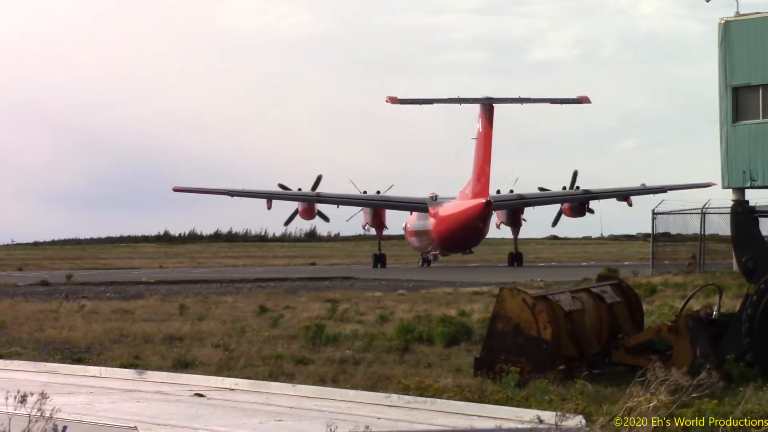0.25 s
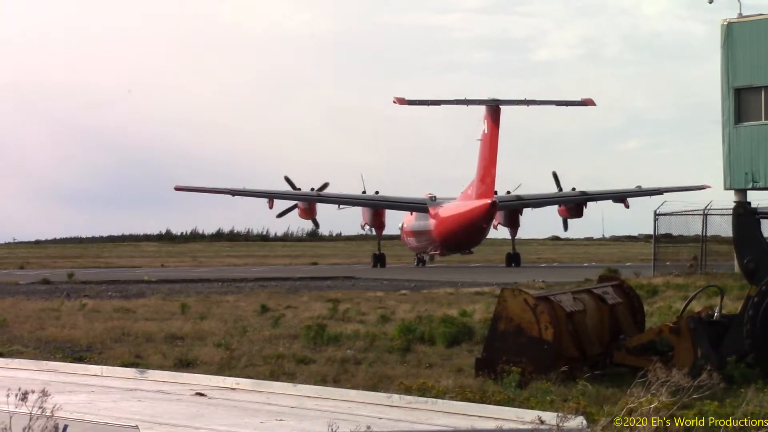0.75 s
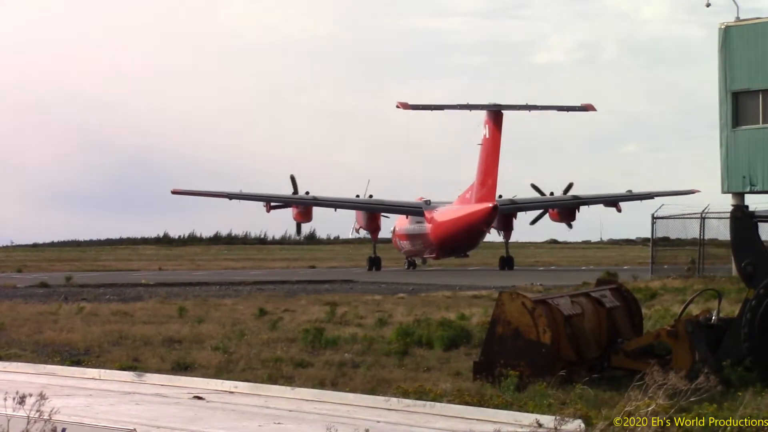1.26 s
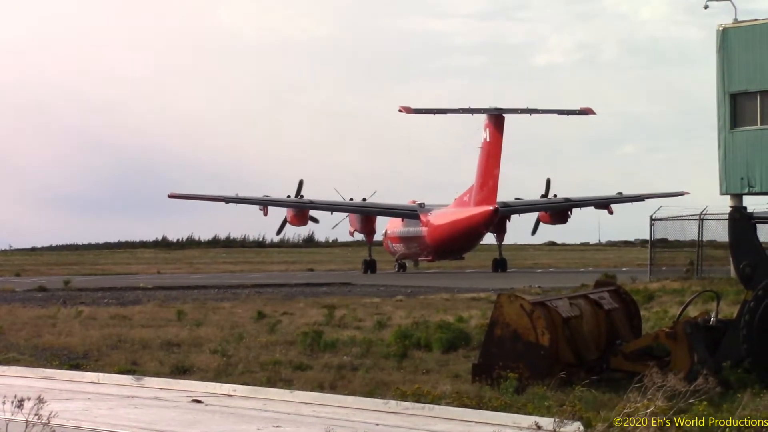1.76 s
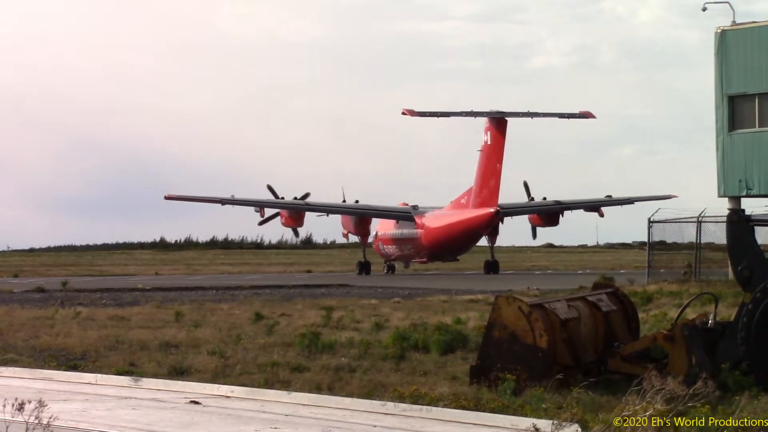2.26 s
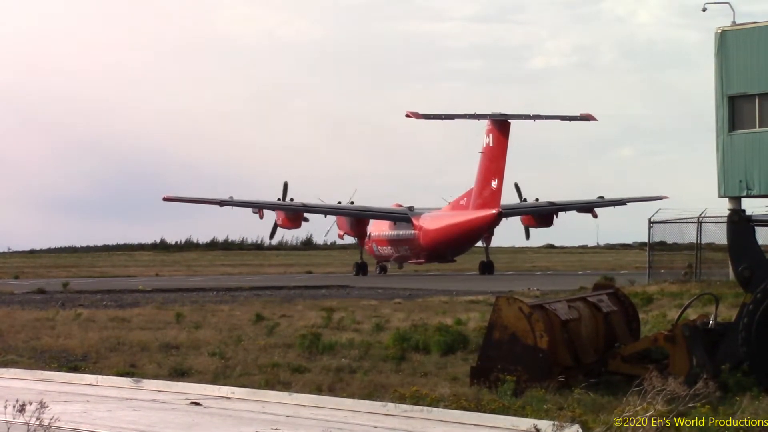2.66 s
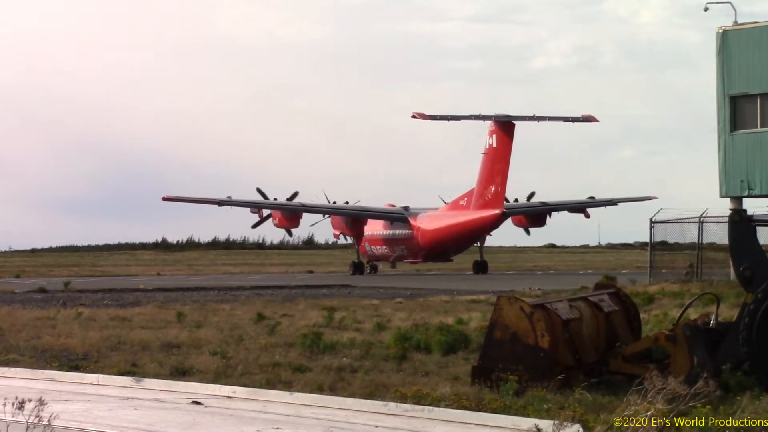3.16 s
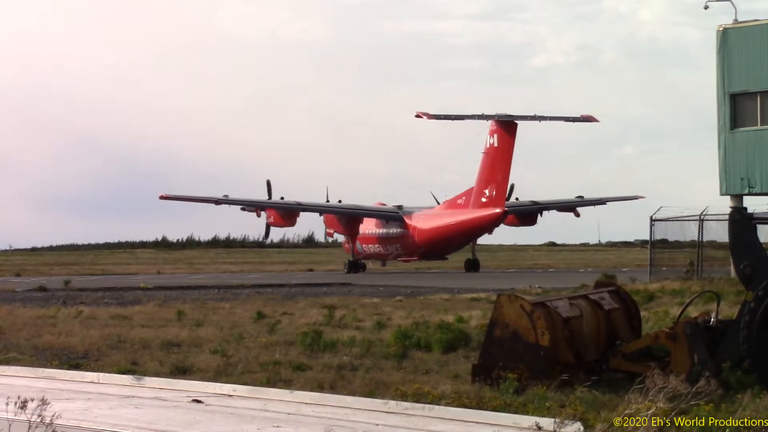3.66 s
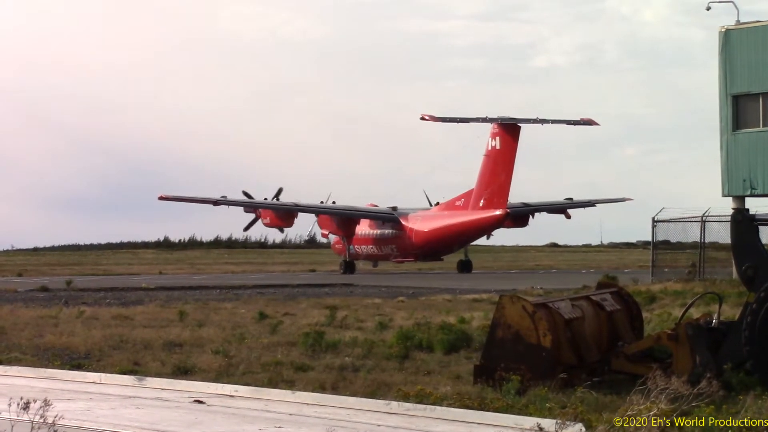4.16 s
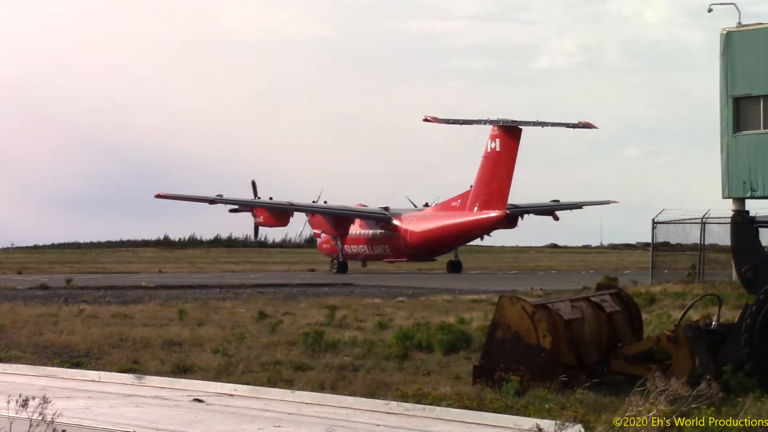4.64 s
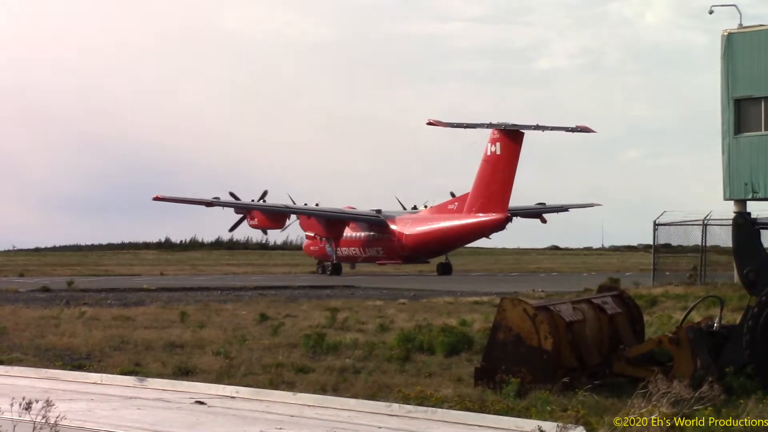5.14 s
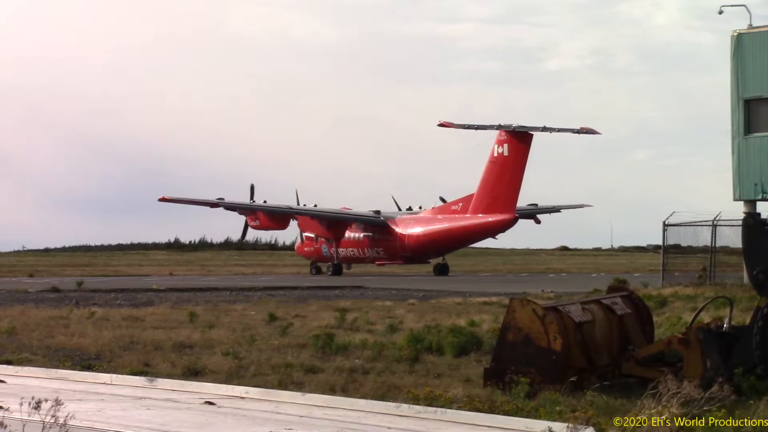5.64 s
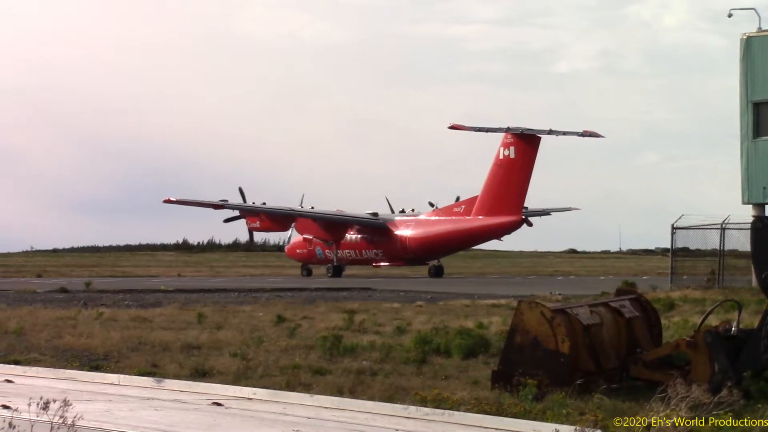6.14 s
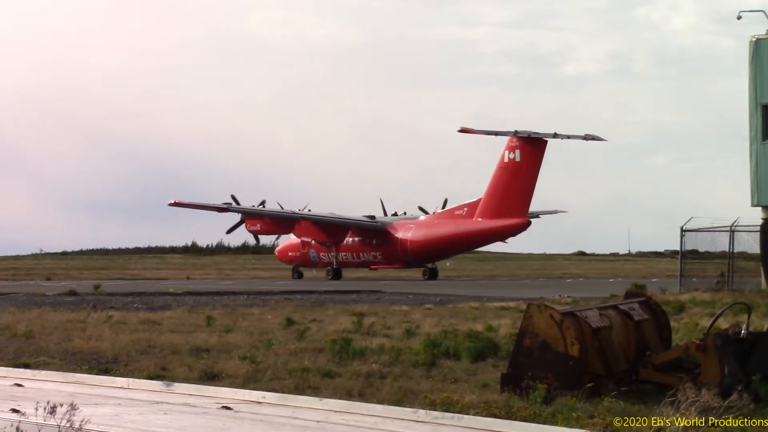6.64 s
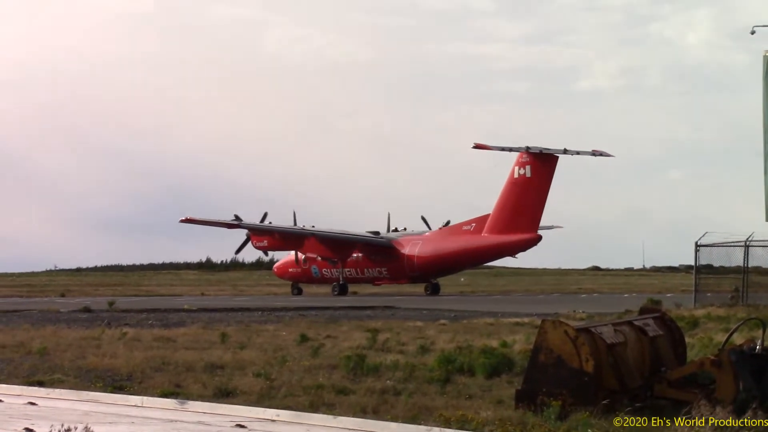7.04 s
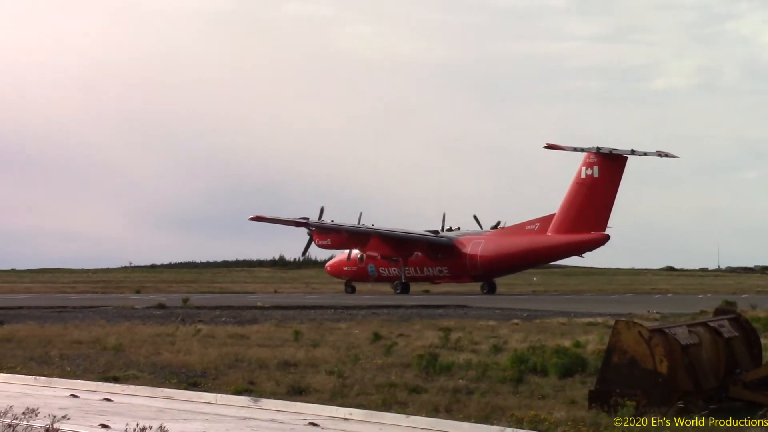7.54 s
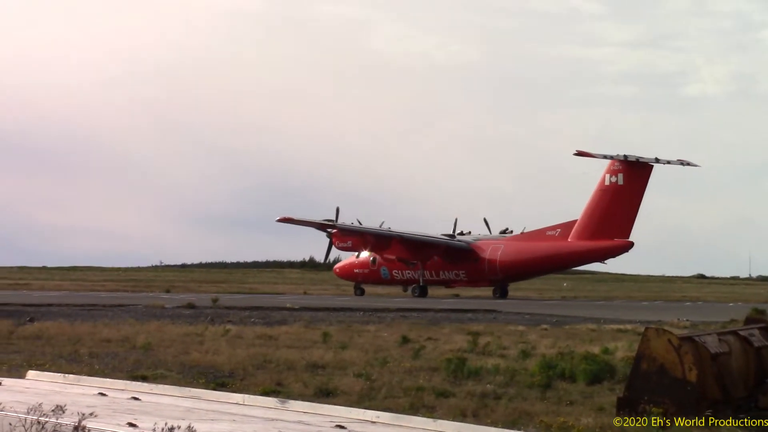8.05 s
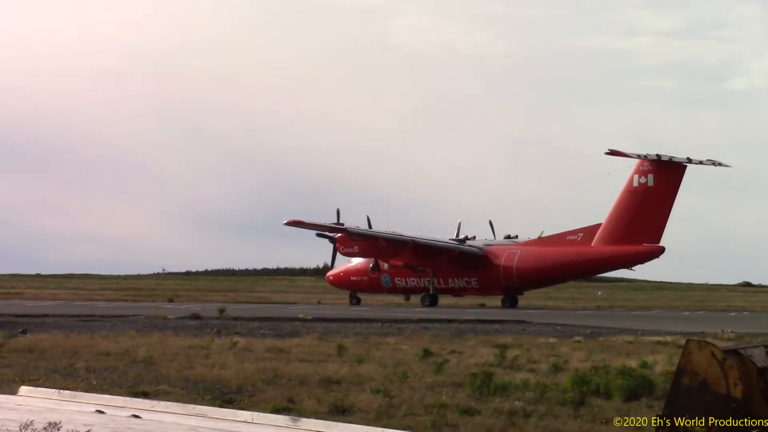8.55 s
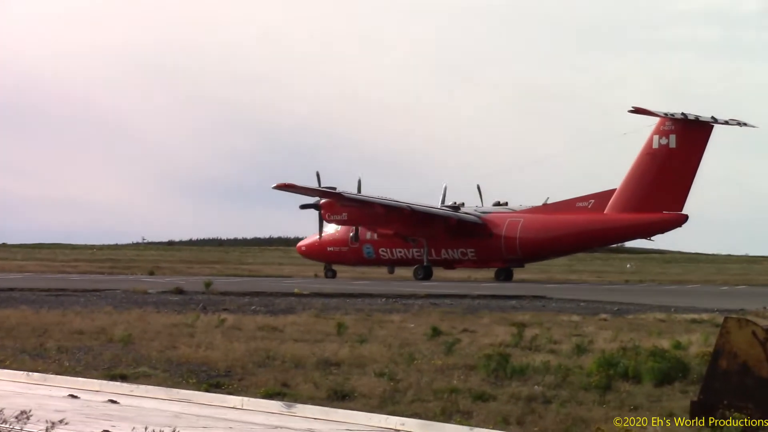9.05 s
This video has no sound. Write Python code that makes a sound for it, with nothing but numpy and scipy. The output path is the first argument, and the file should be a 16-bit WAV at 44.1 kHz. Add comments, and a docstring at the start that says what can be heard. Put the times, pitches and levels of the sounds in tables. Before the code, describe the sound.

A turboprop plane taxis past with a throbbing low drone, roaring propeller wash and a hissing high turbine whine.

```python
"""Turboprop taxiing past

A four-engined turboprop idles across an airfield, turning from tail-on to side-on. Its exhausts
rumble and drone, the propeller wash roars, and the turbines hiss with a fuzzy compressor whine.
As the engines' sides come into view, ducts ring and blades chop the hiss. A breeze nudges the mics."""
import sys
import numpy as np
from scipy.fft import rfft, irfft, next_fast_len
from scipy.io import wavfile
from scipy.ndimage import uniform_filter1d, map_coordinates

SR = 44100
rng = np.random.default_rng(int(sys.argv[2]) if len(sys.argv) > 2 else 0)


def wav_record(signal):
    """Record a signal, one row per channel, as 16-bit PCM in the file named by sys.argv[1]."""
    frames = np.transpose(np.atleast_2d(signal))
    bounded = np.clip(frames, -1, 1)
    # unit amplitude maps onto the largest positive 16-bit level
    quanta = np.round(bounded * 32767).astype(np.int16)
    wavfile.write(sys.argv[1], SR, quanta)


N = 410130

# mic pair: freq_hz, coherence, left_lag_rad, left_minus_right_db
MIC_PAIR = [(60, 0.9, 0, 0.7), (300, 0.89, 0, 0.3), (500, 0.64, 0, 0.5), (810, 0.91, 0, -1),
            (1090, 0.8, 1.03, -2), (1410, 1, 0.34, 0), (1940, 0.4, 0.33, -0.1), (2280, .4, 3, 8),
            (2550, .45, 0.5, 0), (2700, 0.7, 1.5, -4), (3060, 0.4, 1, 0), (4600, .8, 0.8, -3),
            (5700, .6, 0.94, 2.5), (7300, 0.4, 2.5, -1), (8750, 0.2, 0.5, 1), (10500, 0.1, -8.5, 0)]
# time_s, roar_left_minus_right_db, turbine_left_minus_right_db
BALANCE = [(0, -0.5, -0.44), (2.2, -0.9, -0.78), (3.7, 0.4, 0.67), (5.1, 0, 0.64), (6.2, -1.5, -0.0048),
           (9.3, -1.3, 0.065)]
# the turn: time_s, side_share
SIDE_VIEW = [(0, 0.13), (2.2, 0), (4.25, 0.15), (4.65, 0.63), (5.3, 0.92), (6.4, 0.81), (7.8, 1),
             (9.3, 0.81)]
# propeller speed: time_s, turns_per_s
SHAFT_SPEED = [(0, 14.3), (4.9, 14.43), (5.4, 14.79), (7, 14.8), (9.3, 14.85)]
# compressors: time_s, pitch_hz
WHINE_PITCH = [(0, 5006), (.7, 5010), (1.27, 4960), (2.6, 4986), (5.4, 5056), (6.4, 5074), (7.5, 4990),
               (8.15, 4910), (8.6, 4970), (9.3, 4950)]
# level curves: time_s, level_db
DEEP_WASH_LEVEL = [(0.05, -28), (0.1, -26.5), (1.23, -25), (4.25, -29.5), (4.56, -26), (4.74, -28.5),
                   (6.23, -24.5), (6.41, -27), (6.97, -27), (7.76, -29), (9.12, -27), (9.25, -25.5)]
DRONE_LEVEL = [(0.05, -24), (0.5, -23.5), (0.89, -21.5), (1.1, -25.5), (1.45, -22.5), (2.1, -24),
               (2.41, -25.5), (4.23, -25.5), (5.3, -21.5), (5.97, -18), (6.48, -21), (6.65, -21),
               (7.6, -19.5), (8.2, -19.5), (8.65, -21), (8.9, -19), (9.25, -19)]

# noise spectra: freq_hz, relative_density_db
AIR_SPECTRUM = [(100, 14), (3000, 8.5), (9000, 7.5), (12500, 2), (13300, -1), (15700, -4.5)]
INTAKE_SPECTRUM = [(3000, -42.5), (4150, -6), (4500, 1.5), (4750, -2.5), (5100, -3), (5400, -7.5),
                   (5900, -10), (6600, -18.5), (7400, -21), (8400, -21.5), (9300, -28.5), (11000, -35.5),
                   (12500, -43), (13200, -70)]
PIPE_REAR_SPECTRUM = [(500, -52), (1050, 1), (1220, -1), (1500, -2), (1700, -6), (1900, -8), (2150, -16),
                      (2600, -30.5), (8000, -120)]
PIPE_SIDE_SPECTRUM = [(500, -53.5), (1100, -4.5), (1360, 0.5), (1510, -2), (1670, -12), (1870, -6),
                      (2000, -13.5), (2130, -24.5), (7000, -120)]
HISS_REAR_SPECTRUM = [(1200, -21.5), (2100, -1), (2950, 0), (3300, -3), (3950, -3), (4400, -10),
                      (5400, -15.5), (6700, -19.5), (10000, -31), (12500, -36), (16000, -57.5)]
HISS_SIDE_SPECTRUM = [(1200, -26.5), (2200, 3.5), (3300, -1.5), (4000, -3.5), (4400, -8.5), (5400, -19.5),
                      (6700, -28), (12500, -42), (16000, -63.5)]
FLUTTER_SPECTRUM = [(200, -29.5), (400, -1.5), (650, 0), (820, -4), (1050, -19), (2000, -49.5),
                    (4000, -120)]
DEEP_WASH_SPECTRUM = [(100, -61), (350, -0.5), (440, 3), (530, 1), (670, -1.5), (790, -13), (1300, -59),
                      (3000, -120)]
BRIGHT_WASH_SPECTRUM = [(300, -53.5), (620, -7), (750, 1.5), (840, 0.5), (980, -5.5), (1150, -10.5),
                        (1400, -22), (2500, -75.5), (5000, -120)]
RUMBLE_SPECTRUM = [(35, -40.5), (49, -15), (58, 1), (70, 1.5), (86, -2), (104, 1), (128, 4.5), (150, -2),
                   (175, -3), (240, -13.5), (700, -120)]
DRONE_REAR_SPECTRUM = [(100, -39), (160, -7), (190, -5), (290, -1.5), (360, -2), (430, -4.5), (520, -19),
                       (900, -48), (2000, -120)]
DRONE_SIDE_SPECTRUM = [(100, -34.5), (160, -8), (200, -0.5), (280, 1), (360, -1.5), (425, -10),
                       (520, -25.5), (900, -52), (2000, -120)]

# resonances: centre_hz, width_hz, lift_db
DUCT_MODES = [(2470, 290, 7.2), (2954, 230, 6.3), (3670, 520, 5.3)]
EXHAUST_MODES = [(187, 24.5, 8.5), (238.2, 16, 5.5), (259.3, 20.2, 6.5), (303, 33.7, 5.5), (387, 130, 1)]

# wind on the mics: centre_s, half_length_s, level_db
GUSTS = [(1.6, .06, -42), (2.17, .15, -46), (5.28, 0.071, -42), (5.942, 0.12, -36), (6.218, .07, -40),
         (7.5, .12, -50), (8.65, .06, -48)]
# swells and sags: centre_s, half_length_s, lift_db
WHINE_FLARES = [(.25, .3, 4), (1.58, .08, 4), (6.2, .35, 2), (7.8, .35, -0.5)]
INTAKE_SURGES = [(5.22, 0.22, 2.5), (6.0, 0.31, 2), (7.05, 0.21, 2.5), (9.1, 0.6, 5)]
DRONE_THROBS = [(.92, 0.027, 3), (1.77, 0.027, -9), (1.87, 0.041, 0.5), (3.92, .04, -2),
                (5.35, 0.015, -4.5), (5.5, 0.023, 5), (5.57, 0.02, -5), (5.93, 0.024, 3),
                (6.07, 0.044, -6.5), (6.125, 0.014, 6), (6.26, 0.02, 5), (6.44, 0.036, 4),
                (6.53, 0.033, -6), (6.76, 0.034, 2.5), (6.92, 0.046, 3), (7.02, 0.026, -4.5),
                (7.14, 0.051, 1), (7.5, 0.027, 3), (7.62, 0.029, 3), (7.89, 0.057, -4.5),
                (8.06, 0.042, -6.5), (8.14, .03, 2), (8.335, 0.021, 2.5), (8.81, 0.019, 6),
                (9.14, 0.019, 5)]

# noise bursts: centre_s, centre_hz, width_hz, half_length_s, level_db
COMPRESSOR_SQUEALS = [(.3, 4000, 180, .35, -61.5), (1.27, 4850, 60, .06, -57),
                      (4.72, 5630, 800, 0.15, -60.5), (5.0, 4580, 300, .28, -57),
                      (5.08, 5750, 450, .13, -60), (5.13, 7800, 800, .16, -72), (6.05, 5100, 220, .15, -58),
                      (6.38, 5080, 240, .19, -57), (6.95, 8400, 700, .2, -78), (7.05, 4450, 600, 0.19, -54),
                      (7.08, 5000, 220, .13, -55.3), (7.72, 4900, 160, .1, -56), (8.13, 4900, 80, .13, -54),
                      (8.88, 8400, 600, .14, -72), (9.05, 4970, 200, 0.3, -52), (9.13, 4540, 250, .17, -54),
                      (9.22, 8300, 800, .12, -73)]  # tones beamed at the mics
BLADE_SLAPS = [(2.75, 680, 600, .0016, -19.5), (2.872, 700, 600, .0016, -21.5),
               (4.622, 3600, 3200, .004, -46), (4.691, 3600, 3200, .004, -47),
               (4.76, 3600, 3200, .004, -48), (4.829, 3600, 3200, 0.003, -39.5),
               (5.039, 3600, 3200, .005, -45), (5.181, 3600, 3200, .007, -45),
               (5.21, 3600, 3200, .004, -44), (5.548, 1400, 450, .002, -29),
               (5.565, 1400, 450, 0.0023, -35), (5.581, 1310, 500, 0.0022, -24.5),
               (5.734, 1400, 600, .0025, -29), (5.751, 1340, 600, 0.0018, -32),
               (5.917, 700, 600, .0014, -22), (5.985, 680, 500, 0.0014, -24),
               (6.053, 610, 500, 0.0023, -16.5), (6.106, 700, 500, 0.0013, -18),
               (6.19, 640, 500, 0.0018, -16), (6.207, 580, 500, .002, -14.5), (6.257, 1350, 600, .002, -31),
               (6.395, 1400, 600, 0.0024, -30), (6.528, 1400, 600, 0.0027, -34),
               (6.653, 950, 900, .0016, -27), (7.02, 1400, 600, 0.0022, -27)]  # blades hit rough air
WASH_WHOOSHES = [(.82, 990, 110, 0.074, -33), (.92, 1140, 260, 0.22, -39.5), (0.93, 842, 16, 0.079, -27.5),
                 (.95, 660, 300, 0.17, -34), (1.27, 760, 400, .035, -30.5), (.97, 1820, 500, .12, -48.5),
                 (1.48, 300, 46, .045, -25), (1.55, 355, 60, 0.036, -21), (1.972, 398, 110, 0.049, -22.5),
                 (2.21, 298, 81, 0.05, -18), (2.2, 418, 110, 0.12, -26.5), (3.142, 182, 77, 0.022, -19.5),
                 (5.482, 135, 85, 0.02, -17.5), (5.45, 594, 300, 0.025, -26), (6.177, 704, 260, 0.006, -25),
                 (6.24, 420, 140, .07, -33), (7.0, 399, 110, 0.35, -29.5), (7.16, 367, 50, .05, -23),
                 (7.12, 108, 45, 0.1, -25)]

# phases of the turn: centre_s, half_length_s
TAIL_ON_S = (1.0, 0.7)  # slipstream sweeps the mics
HISS_LULL_S = (2.55, 1)
FAST_SWING_S = (4.8, 1)
EDGE_ON_S = (6.07, 0.2)
REAR_QUARTER_S = (6.26, 1.6)
DEEP_CHOP_S = (6.8, 1.1)


def amp(db):
    """Decibels to gain."""
    return 10 ** (np.asarray(db) / 20)


def unit(x):
    """x at rms 1."""
    return x / np.sqrt(np.mean(x ** 2) + 1e-20)


def over_frequency(rows, hz):
    """Table columns interpolated on a log frequency axis."""
    freq_hz, *columns = np.transpose(rows)
    return [np.interp(np.log(hz + 1), np.log(freq_hz + 1), c) for c in columns]


def over_time(rows):
    """Table columns interpolated per sample."""
    time_s, *columns = np.transpose(rows)
    return [np.interp(np.arange(N) / SR, time_s, c) for c in columns]


def wobble(rate_hz):
    """Smooth random curve."""
    knots = rng.standard_normal(int(N * rate_hz / SR) + 4)
    return map_coordinates(knots, [np.arange(N) * rate_hz / SR])


def phase_rad(hz):
    """Running angle of a changing rate."""
    return 2 * np.pi * np.cumsum(hz) / SR


def swell(centre_s, half_length_s):
    """Bell curve, peak 1."""
    return np.exp(-((np.arange(N) / SR - centre_s) / half_length_s) ** 2)


def surges_db(rows):
    """Sum of one swell per row."""
    return sum(lift_db * swell(centre_s, half_s) for centre_s, half_s, lift_db in rows)


def side_share():
    """Share of the engines' sides in view, 0-1."""
    return np.clip(over_time(SIDE_VIEW)[0], 0, 1)


def by_aspect(rear, side):
    """Equal-power fade from rear to side sound as the aircraft turns."""
    share = side_share()
    return np.sqrt(1 - share) * rear + np.sqrt(share) * side


def directivity_db(side_db, tail_db, quarter_db):
    """Lift when heard side-on, tail-on and from the rear quarter."""
    return side_db * side_share() + tail_db * swell(*TAIL_ON_S) + quarter_db * swell(*REAR_QUARTER_S)


def rush(spectrum, modes=()):
    """Turbulent noise with resonances at the two mics; their mean has rms 1."""
    size = next_fast_len(N + 8192)
    hz = np.fft.rfftfreq(size, 1 / SR)
    modes_db = sum(db / (1 + (2 * (hz - centre_hz) / width_hz) ** 4) for centre_hz, width_hz, db in modes)
    level_db = over_frequency(spectrum, hz)[0] + modes_db
    coherence, lag_rad, balance_db = over_frequency(MIC_PAIR, hz)
    mix_rad = np.arccos(np.clip(coherence, 0, 1)) / 2
    common, apart = rfft(rng.standard_normal((2, size))) * amp(level_db)
    sign = np.array([[1], [-1]])
    pair = np.cos(mix_rad) * common + sign * np.sin(mix_rad) * apart
    pair = pair * amp(sign * balance_db / 2) * np.exp(-sign * 0.5j * lag_rad)
    pair = irfft(pair, size)[:, :N]
    return pair / np.std(pair.mean(axis=0))


def steadied(x, share):
    """Noise with a share of its slow swells evened out."""
    power = np.abs(uniform_filter1d(np.mean(x ** 2, axis=0), size=SR // 8))
    return x * (power / power.mean()) ** (-share / 2)


def bursts(rows, coherence):
    """One swelling and fading stereo noise band per row."""
    size = 65536
    time_s = (np.arange(size) - size // 2) / SR
    hz = np.fft.rfftfreq(size, 1 / SR)
    out = np.zeros((2, N + 2 * size))
    for centre_s, centre_hz, width_hz, half_s, level_db in rows:
        band = np.exp(-(2 * (hz - centre_hz) / width_hz) ** 4 / 2)
        noise = irfft(rfft(rng.standard_normal((3, size))) * band)
        bell = np.exp(-(time_s / half_s) ** 2)
        pair = (np.sqrt(coherence) * noise[0] + np.sqrt(1 - coherence) * noise[1:]) * bell
        start = round(centre_s * SR)
        out[:, start:start + size] += amp(level_db) * np.sqrt(np.mean(bell ** 2)) * unit(pair)
    return out[:, size // 2:][:, :N]


def open_air():
    """Soft wind buffets on the mics over a faint steady hiss."""
    breeze = amp(-53 + 3 * wobble(8.5))
    gusts = sum(amp(level_db) * swell(centre_s, half_s) for centre_s, half_s, level_db in GUSTS)
    buffets = rush([(10, -15), (22, -4), (40, -1.5), (52, -2), (90, -25), (600, -120)])
    return (breeze + gusts) * steadied(buffets, share=0.7) + amp(-72.5) * rush(AIR_SPECTRUM)


def shaft_angle_rad(blade_pass_s=6.053):
    """Slightly unsteady propeller angle, zero at one blade pass."""
    angle_rad = phase_rad(over_time(SHAFT_SPEED)[0] + 0.04 * wobble(3))
    return angle_rad - angle_rad[round(blade_pass_s * SR)]


def blade_chop(shaft_rad):
    """Four blades chop the flow unevenly; a once-a-turn beat stands out in mid-swing."""
    per_blade = np.cos(4 * shaft_rad) + 0.4 * np.cos(8 * shaft_rad)
    per_turn = np.cos(shaft_rad) + 0.8 * np.cos(2 * shaft_rad) + 0.4 * np.cos(3 * shaft_rad)
    bite = amp(1.5 * wobble(30))
    chop = (0.068 + 0.22 * swell(*DEEP_CHOP_S)) * bite * per_blade
    beat = (0.02 + 0.08 * swell(*FAST_SWING_S)) * per_turn
    return chop, beat


def compressors(chop):
    """Four tones at slightly different speeds, smeared and flared by turbulence; a faint whistle."""
    pitch_hz, = over_time(WHINE_PITCH)
    level_db = -66 + directivity_db(side_db=10.5, tail_db=3, quarter_db=-1.5) + surges_db(WHINE_FLARES)
    whine = np.zeros((2, N))
    for detune in np.linspace(-0.022, 0.022, 4):
        angle_rad = phase_rad(pitch_hz * (1 + detune + 0.006 * wobble(4)) + 55 * wobble(220))
        direct = wobble(60) + 1j * wobble(60)
        flare = amp(3.8 * wobble(5.3))
        for mic, lead_rad in enumerate((-0.4, 0.4)):
            scattered = 0.49 * (wobble(60) + 1j * wobble(60))
            whine[mic] += flare * np.real((direct + scattered) * np.exp(1j * (angle_rad + lead_rad)))
    whine = unit(steadied(whine, share=0.6)) * amp(level_db) * amp([[-0.8], [0.8]])
    whistle = amp(-85.5) * rush([(7300, -50), (7680, -4), (7820, 0), (7970, -5), (8400, -50)])
    return whine * (1 + 0.5 * chop) + whistle


def turbines(chop, beat):
    """Jet-pipe roar and hiss; from the side the ducts ring and the intakes open up."""
    surge_db = surges_db(INTAKE_SURGES)
    lull = swell(*HISS_LULL_S)
    pipe_db = -41 + directivity_db(side_db=3, tail_db=3, quarter_db=1.5)
    hiss_db = -53 + directivity_db(side_db=5, tail_db=2, quarter_db=0) + 0.81 * surge_db - 1.7 * lull
    intake_db = -62 + directivity_db(side_db=8, tail_db=3, quarter_db=1.5) + surge_db - 3 * lull
    # eddies in the warm air flutter each part separately
    pipe = by_aspect(rush(PIPE_REAR_SPECTRUM), rush(PIPE_SIDE_SPECTRUM))
    pipe *= amp(pipe_db + 0.49 * wobble(60) + 0.43 * wobble(12))
    hiss = by_aspect(rush(HISS_REAR_SPECTRUM), rush(HISS_SIDE_SPECTRUM, DUCT_MODES))
    hiss *= amp(hiss_db + 0.56 * wobble(25))
    intake = rush(INTAKE_SPECTRUM) * amp(intake_db + 0.93 * wobble(25))
    return (pipe * (1 + 1.3 * chop + 0.6 * beat)
            + hiss * (1 + 0.4 * chop + 0.7 * beat)
            + intake * (1 + 0.75 * chop + 1.6 * beat))


def blade_flutter(shaft_rad, puff_half_s=0.002, scatter_db=2.5):
    """One uneven puff per passing blade: a rattle, loudest with the propeller edge-on."""
    from_pass_s = np.angle(np.exp(4j * shaft_rad)) / (8 * np.pi * over_time(SHAFT_SPEED)[0])
    puffs = np.exp(-(from_pass_s / puff_half_s) ** 2) * amp(scatter_db * wobble(60))
    strength = amp(-30) * swell(*DEEP_CHOP_S) + amp(-25) * swell(*EDGE_ON_S)
    return rush(FLUTTER_SPECTRUM) * puffs * strength


def propeller_wash(chop):
    """Air thrown back by the blades, pulsing as they pass, brightest straight behind."""
    deep = steadied(rush(DEEP_WASH_SPECTRUM), share=0.21) * amp(over_time(DEEP_WASH_LEVEL)[0] - 0.26)
    bright_db = -33.5 + directivity_db(side_db=-0.3, tail_db=5, quarter_db=-0.05)
    bright_db += 1.1 * swell(*FAST_SWING_S)
    bright = steadied(rush(BRIGHT_WASH_SPECTRUM), share=0.2) * amp(bright_db + 0.65 * wobble(6.4))
    return (deep + bright) * amp(0.42 * wobble(70)) * (1 + 0.26 * chop)


def exhausts(chop):
    """Combustion rumble under a throbbing drone of broad resonances, deeper from the side."""
    rumble_db = -27.5 + directivity_db(side_db=-0.46, tail_db=0.1, quarter_db=1.75)
    rumble_db += 1.8 * swell(*FAST_SWING_S)
    rumble = steadied(rush(RUMBLE_SPECTRUM), share=0.26) * amp(rumble_db + 0.49 * wobble(8))
    rear = rush(DRONE_REAR_SPECTRUM, EXHAUST_MODES)
    side = rush(DRONE_SIDE_SPECTRUM, EXHAUST_MODES)
    drone_db = over_time(DRONE_LEVEL)[0] - 0.1 + surges_db(DRONE_THROBS)
    drone = steadied(by_aspect(rear, side), share=0.42) * amp(drone_db)
    return rumble + drone * (1 + 0.37 * chop)


def scene():
    """Low roar and turbine sound, each drifting slightly in balance, over the breeze."""
    shaft_rad = shaft_angle_rad()
    chop, beat = blade_chop(shaft_rad)
    roar = exhausts(chop) + propeller_wash(chop) + blade_flutter(shaft_rad)
    roar += bursts(WASH_WHOOSHES, coherence=0.96) + bursts(BLADE_SLAPS, coherence=1)
    turbine = turbines(chop, beat) + compressors(chop)
    turbine += bursts(COMPRESSOR_SQUEALS, coherence=0.65) * (1 + chop / 2 + beat)
    roar_pan_db, turbine_pan_db = over_time(BALANCE)
    sides = np.array([[0.5], [-0.5]])
    return roar * amp(sides * roar_pan_db) + turbine * amp(sides * turbine_pan_db) + open_air()


def record(dry):
    """Brick-wall low-pass."""
    cutoff_hz = 15720
    size = next_fast_len(N + 8192)
    passband = np.fft.rfftfreq(size, 1 / SR) < cutoff_hz
    return irfft(rfft(dry, size) * passband, size)[:, :N]


dry = scene()
out = record(dry)
wav_record(out)
```